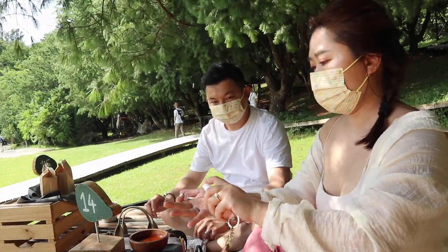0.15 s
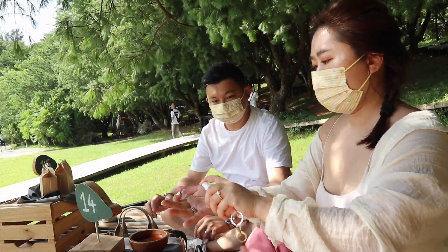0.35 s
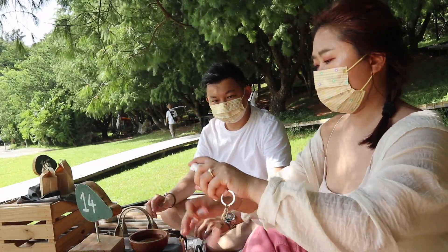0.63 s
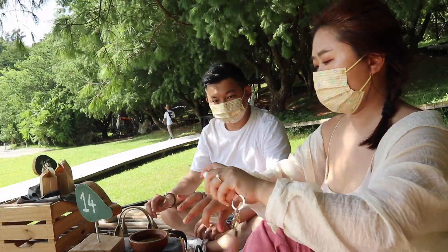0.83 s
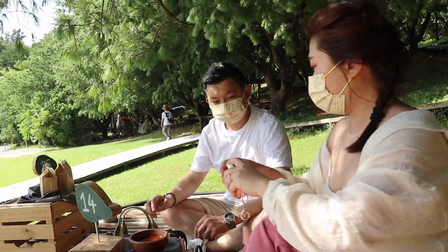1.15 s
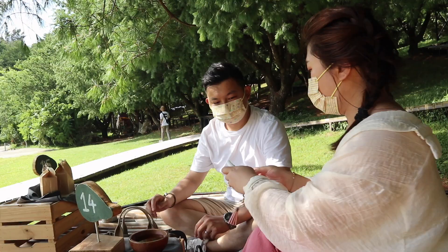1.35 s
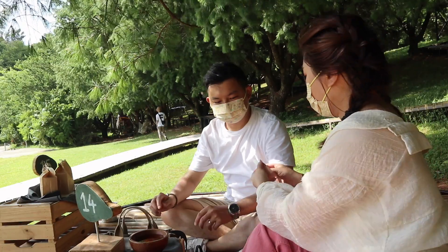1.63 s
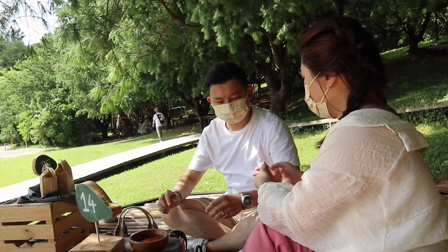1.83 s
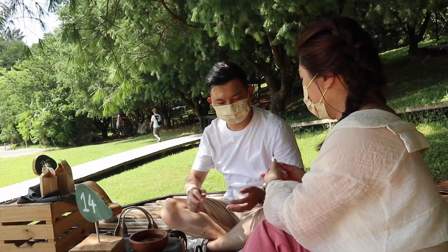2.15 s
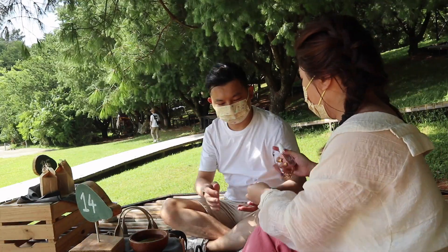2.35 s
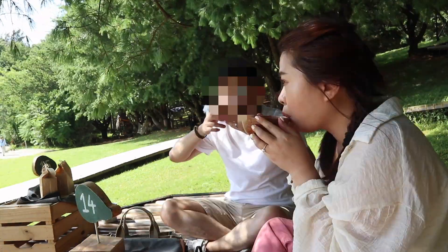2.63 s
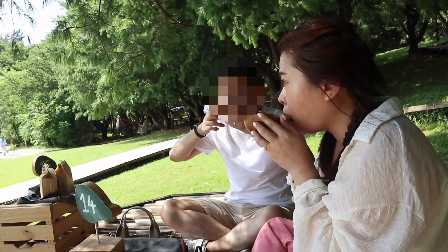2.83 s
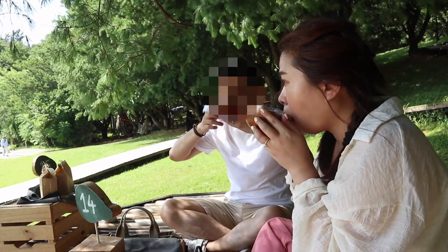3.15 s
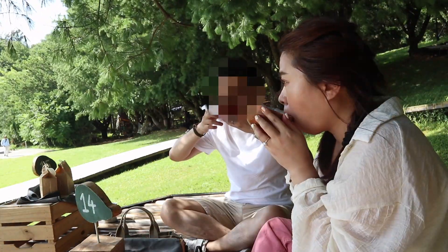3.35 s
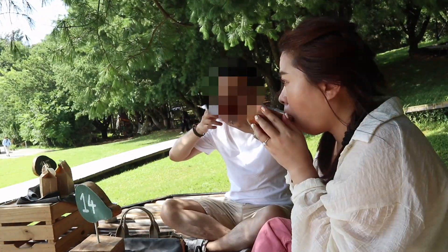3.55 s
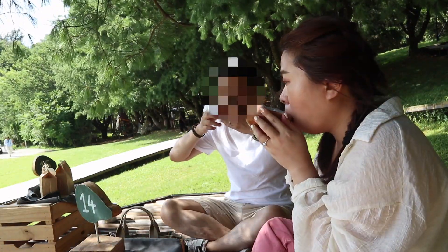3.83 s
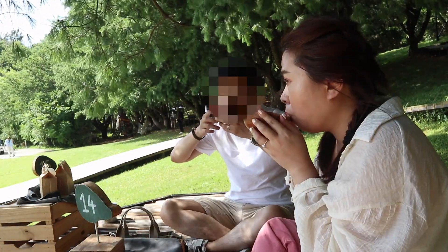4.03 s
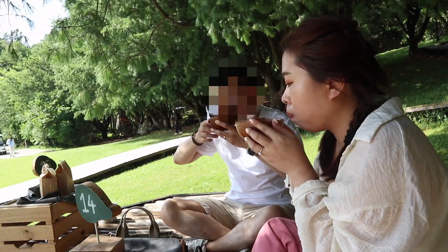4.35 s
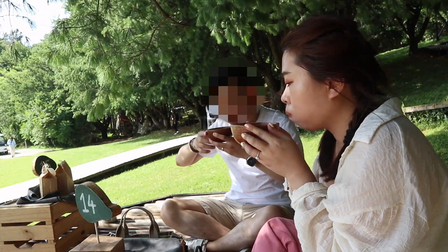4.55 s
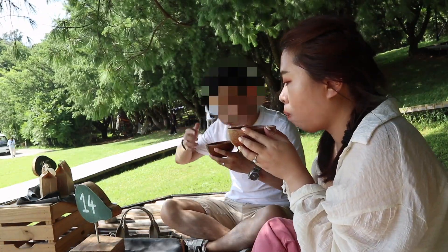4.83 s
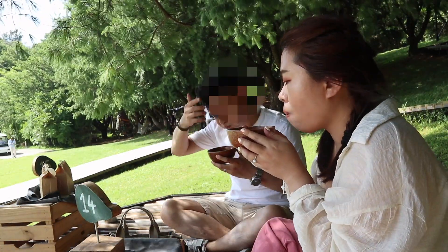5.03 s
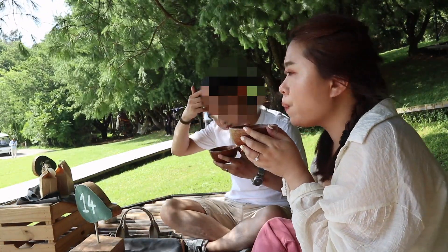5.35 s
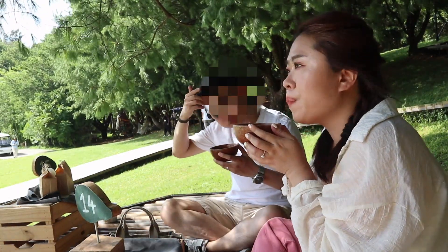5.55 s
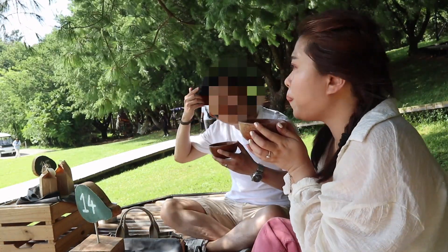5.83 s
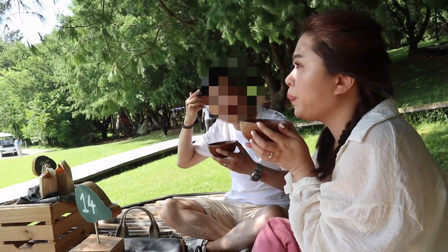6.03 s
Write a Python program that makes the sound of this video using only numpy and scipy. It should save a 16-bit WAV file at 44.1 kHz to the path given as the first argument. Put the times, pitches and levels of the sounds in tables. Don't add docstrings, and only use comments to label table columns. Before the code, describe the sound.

Leaves hiss in a park breeze with droning cicadas and a few far bird chirps, then hard low gusts buffet and slap the microphone.

```python
import sys
import numpy as np
from scipy import signal
from scipy.fft import rfft, irfft
from scipy.io import wavfile
from scipy.ndimage import uniform_filter1d

SR = 44100
rng = np.random.default_rng(int(sys.argv[2]) if len(sys.argv) > 2 else 0)


def level_to_linear(level):
    exponent = np.asarray(level, float) / 20
    return 10 ** exponent


def pcm_store(signal):
    levels = np.round(np.clip(np.atleast_2d(signal), -1, 1) * 32767)
    wavfile.write(sys.argv[1], SR, levels.astype(np.int16).T)


N = 273420

CUTS = [0, 2.508, 4.749, 6.3]
FRAMES = N // 128 + 5
HZ = np.fft.rfftfreq(512, 1 / SR)


def evened(x):
    return x / np.sqrt(np.mean(x ** 2) + 1e-20)


def read(points, hz):
    f, value = np.transpose(points)
    return np.interp(np.log(hz + 1), np.log(f + 1), value)


def add(mix, s, sound):
    part = mix[..., round(s * SR):][..., :sound.shape[-1]]
    part += sound[..., :part.shape[-1]]


def view_gate(k, fade_s=0.0002):
    t = np.arange(N) / SR
    opening = np.clip((t - CUTS[k]) / fade_s + 0.5 + (k == 0), 0, 1)
    closing = np.clip((CUTS[k + 1] - t) / fade_s + 0.5, 0, 1)
    return opening * closing


def coloured(x, points):
    gain = level_to_linear(read(points, np.fft.rfftfreq(len(x), 1 / SR)))
    return irfft(rfft(x) * gain, len(x))


def noise(field_db):
    a, b = rng.standard_normal((FRAMES, len(HZ), 2)).T
    spectra = (a + 1j * b) * level_to_linear(field_db)
    return signal.istft(spectra, nperseg=512, noverlap=384)[1][:N]


def grove(x, t60, direct):
    t = np.arange(SR // 4) / SR
    signs = rng.choice([-1., 1.], (2, len(t)))
    sparse = rng.random((2, len(t))) < 0.05
    tail = signs * sparse * level_to_linear(-60 * t / t60)
    tail /= np.linalg.norm(tail, axis=1)[:, None]
    tail[:, 0] = direct
    return signal.fftconvolve(x, tail, axes=1)[:, :N]


def swells(t, rows, rise, fall):
    start, hold, db = np.transpose(rows)[:3, :, None]
    return db - rise * np.maximum(start - t, 0) - fall * np.maximum(t - start - hold, 0)


def leaves(patchy_db=0.54, flicker_db=0.2):
    # (frequency [Hz], density [dB])
    sum_spectra = [
        [(18, -31), (30, -5), (69, -0.5), (130, -6.5), (206, -5), (407, -4.5), (643, -4), (807, -3.5),
         (1340, -3.5), (3170, -17.5), (5970, -31.5), (6950, -35.5), (11500, -25.5), (12800, -27.5),
         (16600, -63), (22000, -120)],
        [(18, -64), (30, -11), (324, -6), (499, 1), (581, -0.5), (893, 0.5), (2220, -5), (6120, -25),
         (7130, -33.5), (8510, -26), (10700, -17), (11500, -23), (12800, -94), (16600, -94), (22000, -120)],
        [(530, -38.5), (900, -9.5), (3640, -28), (5310, -37), (6140, -38.5), (8010, -60), (9150, -35),
         (10800, -31.5), (12800, -41.5), (16600, -84), (22000, -120)],
    ]
    # (frequency [Hz], density [dB])
    difference_spectra = [
        [(59, -48), (100, -32), (176, -12.5), (1030, 4), (2470, -0.5), (2730, -1), (4270, -2), (6150, -5),
         (8000, -21.5), (11300, -3.5), (12800, -12), (16600, -44), (22000, -120)],
        [(530, -68), (900, -29), (1050, -67), (1280, -47), (1550, -22.5), (1960, -15), (2310, -15), (3370, -7),
         (8190, -17), (10600, -6), (12800, -24.5), (16600, -45), (22000, -120)],
        [(1290, -35), (2200, -2), (2610, -10), (3270, 0), (6880, -8), (7910, -11), (8900, -14.5), (11000, 0.5),
         (12800, -13), (16600, -38), (22000, -120)],
    ]
    # (time [s], level [dB])
    breeze = [
        [(0.0, 1.34), (2.51, 0.5)],
        [(2.51, -0.04), (4.75, 0.3)],
        [(4.749, -5), (6.2, -6.5)],
    ]
    sum_db, difference_db = [-36, -40.5, -51], [-44, -47, -57]
    t = np.arange(N) / SR
    patches = rng.standard_normal((FRAMES, len(HZ))).T
    patches = uniform_filter1d(patches, size=7, axis=0)
    patches = evened(uniform_filter1d(patches, size=24, axis=1))
    flicker = evened(uniform_filter1d(rng.standard_normal(FRAMES), size=20))
    field_db = patchy_db * patches + flicker_db * flicker
    common, apart = noise(field_db), noise(field_db)
    out = np.zeros((2, N))
    for k in range(3):
        gain = view_gate(k) * level_to_linear(np.interp(t, *np.transpose(breeze[k])))
        out[0] += gain * level_to_linear(sum_db[k]) * evened(coloured(common, sum_spectra[k]))
        out[1] += gain * level_to_linear(difference_db[k]) * evened(coloured(apart, difference_spectra[k]))
    return out


def airflow(t):
    # (time [s], level [dB], eddy pitch [Hz], share of small eddies [dB])
    steady = [
        [(0, -72, 70, -37), (0.9, -50, 70, -37), (1.7, -44.5, 70, -41), (2.45, -50.5, 70, -41)],
        [(2.56, -46, 89, -28), (2.7, -68, 226, -32), (2.9, -60, 120, -30), (3.05, -72, 190, -30),
         (3.64, -72.5, 144, -40), (3.9, -37, 177, -52), (4.3, -31.5, 224, -34), (4.62, -30, 220, -35),
         (4.65, -50.5, 169, -39)],
        [(4.75, -39, 198, -37), (5.1, -30, 230, -36.5), (5.4, -34, 270, -27.5), (5.55, -37.5, 316, -37),
         (6.2, -31, 338, -16.5)],
    ]
    # (start [s], hold [s], level [dB], share of small eddies [dB])
    light_gusts = [(0.09, .02, -57, -38), (0.49, .03, -46, -35), (0.815, 0.017, -46.5, -44),
                   (1.022, 0.037, -47.5, -42), (1.45, .17, -53.5, -44), (1.743, 0.54, -43.5, -29),
                   (2.44, 0.021, -37, -37)]
    # (start [s], hold [s], level [dB], share of small eddies [dB])
    hard_gusts = [(2.725, 0.013, -36.5, -46), (2.8, 0.043, -42, -41), (2.98, 0.016, -50, -40),
                  (3.685, 0.086, -38.5, -60.5), (3.915, 0.12, -32, -41), (4.03, 0.1, -28.5, -34),
                  (4.23, 0.023, -28.5, -50), (4.312, 0.041, -25.5, -29), (4.42, 0.056, -29, -36),
                  (4.574, 0.019, -24, -30), (4.729, 0.015, -31, -21), (4.87, .02, -39, -40),
                  (4.925, 0.0085, -29, -27), (5.0, 0.013, -30.5, -6), (5.075, 0.018, -30.5, -15.5),
                  (5.16, 0.051, -32, -30), (5.386, .05, -31.5, -8.5), (5.444, 0.052, -29, -10),
                  (5.585, 0.023, -34.5, -23), (5.63, 0.022, -31, -25), (5.25, 0.037, -29.5, -34.5),
                  (5.718, 0.0067, -31.5, -28), (5.81, 0.014, -34, -28), (5.91, 0.039, -32.5, -4),
                  (6.025, .025, -30, -13), (6.06, 0.025, -27, -15)]
    s, db, hz, small_db = np.transpose(sum(steady, []))
    light = swells(t, light_gusts, rise=120, fall=250)
    hard = swells(t, hard_gusts, rise=820, fall=620)
    power = level_to_linear(2 * np.vstack([np.interp(t, s, db), light, hard]))
    gust_shares = np.transpose(light_gusts + hard_gusts)[-1][:, None] + 0 * t
    shares = np.vstack([np.interp(t, s, small_db), gust_shares])
    total = power.sum(0)
    return np.sqrt(total), np.interp(t, s, hz), (power * shares).sum(0) / total


def gusts(rise_db=11, top_db=4, fall_db=22, lumps_db=1.5, bright_lumps_db=1.41):
    frame_t = np.arange(FRAMES) * 128 / SR
    level, hz, small_db = airflow(frame_t)
    reach = 2.5 + small_db / fall_db
    octaves = np.log2((HZ[:, None] + 12) / hz)
    field = -10 * np.log10(level_to_linear(-2 * rise_db * octaves) + level_to_linear(2 * top_db * octaves))
    field -= 10 * np.log10(1 + level_to_linear(2 * fall_db * (octaves - reach)))
    field -= 10 * np.log10(np.mean(level_to_linear(2 * field), axis=0))
    puffs = evened(uniform_filter1d(rng.standard_normal(FRAMES), size=4))
    field += bright_lumps_db * puffs * np.clip(np.log2((HZ[:, None] + 1) / 250), 0, 3)
    slow = evened(signal.lfilter(*signal.butter(2, 45, fs=SR), rng.standard_normal(N)))
    lumps = level_to_linear(2 * lumps_db * np.tanh(0.5 * slow))
    shared = evened(noise(field) * lumps)
    own = evened(noise(field) * lumps)
    pair = np.array([shared, own])
    pair /= np.sqrt(uniform_filter1d(pair ** 2, size=2600, axis=1) + 1e-9)
    return np.interp(np.arange(N) / SR, frame_t, level) * pair


def slaps(per_s=45, over_db=3, spread_db=4, swing_hz=620, damping=1.9):
    t = np.arange(0, N, 128) / SR
    level, _, small_db = airflow(t)
    luck, size = rng.random((N, 2)).T
    strength = level_to_linear(over_db + spread_db * np.cos(40 * size))
    hits = (luck < per_s / SR) * np.sign(size - 0.5) * strength
    hits *= np.interp(np.arange(N) / SR, t, level * level_to_linear(0.38 * (small_db + 10)))
    cycles = np.arange(300) / SR * swing_hz
    swing = np.sin(2 * np.pi * cycles) * np.exp(-damping * cycles)
    return signal.oaconvolve(hits, swing)[:N] * 2


def cicada(rate_hz, drum_hz, width_hz, db, drift=0.08, jitter=0.013, uneven_db=3):
    period = SR / rate_hz
    at = np.arange(0, N, period)
    wander, shake, size = rng.standard_normal((len(at), 3)).T
    wander = evened(signal.lfilter([1], [1, -1.8, 0.81], wander))
    at = at + period * (drift * wander + jitter * shake)
    clicks = np.zeros(2 * N)
    clicks[np.clip(2 * at, 0, 2 * N - 1).astype(int)] = level_to_linear(uneven_db * size)
    hz = np.fft.rfftfreq(N, 1 / SR)
    drum = np.exp(-0.5 * ((hz - drum_hz) / (width_hz / 2)) ** 2)
    return level_to_linear(db) * evened(irfft(rfft(clicks)[:len(hz)] * drum, N))


def cicadas(high_db=-3, low_db=-2, mid_db=-9):
    # (click rate [Hz], drum resonance [Hz], drum width [Hz], level [dB])
    high_singers = [
        [(439, 9600, 2500, -2.8)],
        [(546, 10840, 1300, -4), (409.6, 9500, 1500, -4.5)],
        [(530, 9900, 3050, 1.5)],
    ]
    # (click rate [Hz], drum resonance [Hz], drum width [Hz], level [dB])
    low_singers = [
        [(676, 7120, 1730, -0.25), (647, 8500, 1200, -4.5)],
        [(732, 7100, 2000, -1.5), (354.6, 7350, 1000, -2.5)],
        [(704, 7900, 1400, 3.2)],
    ]
    # (start [s], hold [s], level [dB])
    high_song = [
        [(0, 1.23, -45), (2.3, .3, -47.5)],
        [(2.59, 0.036, -41.5), (2.98, 0.2, -41.5), (3.52, 0.2, -41), (4.06, 0.21, -44.5), (4.56, 0.18, -44.5)],
        [(4.97, 1.06, -63)],
    ]
    # (start [s], hold [s], level [dB])
    low_song = [
        [(1.5, 0.65, -45.5)],
        [(2.5, 1.265, -48), (4.6, 0.022, -59.5)],
        [(5.95, .3, -71)],
    ]
    high_floor_db = [-52, -47, -73]
    low_rise, low_fall = [3.8, 30, 32], [45, 170, 100]
    t, out = np.arange(N) / SR, np.zeros((2, N))
    for k in range(3):
        high = swells(t, high_song[k], rise=39, fall=45).max(0)
        high = np.maximum(high, high_floor_db[k])
        low = swells(t, low_song[k], low_rise[k], low_fall[k]).max(0)
        low -= 90 * np.maximum(0.48 - t, 0)
        song = level_to_linear(high + high_db) * sum(cicada(*singer) for singer in high_singers[k])
        song += level_to_linear(low + low_db) * sum(cicada(*singer) for singer in low_singers[k])
        out += view_gate(k) * grove(song[None], t60=0.17, direct=0.42)
    return out * level_to_linear(np.array([[mid_db], [0]]))


def birds(rough=0.46, trill=0.046):
    # (time [s], level [dB], start pitch [Hz], end pitch [Hz], length [s])
    chirps = [(0.45, -41, 3830, 3350, 0.036), (0.473, -37, 3110, 2640, 0.037),
              (0.593, -43, 3220, 3340, 0.032), (0.6, -40.5, 2450, 2940, 0.039),
              (1.071, -39, 3380, 2850, 0.018), (1.34, -44.5, 3600, 2940, 0.055),
              (1.412, -44, 4200, 3450, 0.041), (1.438, -37.5, 3150, 3000, 0.024),
              (3.002, -48.5, 3770, 3850, 0.035), (3.035, -44, 3180, 3040, 0.04),
              (3.067, -48, 3770, 3860, .025), (3.084, -44.5, 3516, 3490, 0.023),
              (3.108, -41.5, 3100, 2780, 0.0275), (3.808, -40.5, 3780, 3390, 0.032),
              (3.851, -46, 3380, 3020, 0.027), (4.127, -43.5, 3370, 3400, 0.033),
              (4.176, -38, 2530, 3540, 0.018), (4.19, -52.5, 3570, 3420, 0.024),
              (3.08, -43, 3180, 3120, 0.027), (5.165, -61, 3310, 3250, 0.026),
              (4.457, -51, 3680, 3500, .02), (5.129, -63.5, 3720, 3280, 0.028),
              (5.176, -56.5, 2840, 2940, .04)]
    off_centre_db = [-5, -19, -15]
    out = np.zeros((2, N))
    for s, db, from_hz, to_hz, length in chirps:
        side_db = off_centre_db[np.searchsorted(CUTS, s) - 1]
        hz = np.linspace(from_hz, to_hz, round(length * SR))
        flutter = evened(uniform_filter1d(rng.standard_normal(4000), size=20))[:len(hz)]
        wobble = evened(uniform_filter1d(rng.standard_normal(4000), size=90))[:len(hz)]
        hz *= 1 + trill * wobble
        whistle = np.sin(2 * np.pi * np.cumsum(hz) / SR)
        note = whistle * (1 + rough * flutter) * np.hanning(len(hz))
        add(out, s, level_to_linear(db) * note * level_to_linear(np.array([[0], [side_db]])))
    return grove(out, t60=0.2, direct=0.95) * level_to_linear(-1.5)


def pops(trim_db=-2, damping=1.8, edge_hz=2600, snap=0.5):
    # (time [s], peak level [dB], swing frequency [Hz])
    eddies = [(2.721, -20, 252), (4.049, -18.5, 200), (4.17, -12, 200), (4.309, -7, 238), (4.367, -9, 215),
              (4.438, -31, 270), (4.732, -34, 210), (4.837, -27, 280), (4.919, -29, 303),
              (4.984, -18.5, 255), (5.041, -24, 364), (5.328, -33, 344), (5.402, -28, 283),
              (5.45, -25.5, 290), (5.536, -31.5, 557), (5.629, -31, 290), (5.707, -24, 400),
              (5.721, -21.5, 330), (5.77, -24, 400), (5.818, -23, 330), (5.794, -25, 258),
              (5.864, -17, 500), (5.882, -21, 420), (5.946, -24, 536), (5.926, -22.5, 307),
              (6.032, -24, 530), (6.075, -27, 366), (6.106, -38, 549), (6.129, -14.5, 480)]
    out = np.zeros(N)
    for s, db, hz in eddies:
        cycles = np.arange(900) / SR * hz
        decay = np.exp(-damping * cycles)
        swing = np.sin(2 * np.pi * cycles) + snap * np.sin(6 * np.pi * cycles) * decay
        add(out, s, level_to_linear(db + trim_db) * swing * decay)
    return signal.lfilter(*signal.butter(2, edge_hz, fs=SR), out)


def microphone_wind():
    # (frequency [Hz], gain [dB])
    bass_cut = [(20, -19), (60, -4.5), (120, 1.5), (4000, -11.5)]
    # (frequency [Hz], gain [dB])
    port_difference = [(40, -40), (150, -47), (350, -25.5), (700, -17.5), (1300, -8.5), (3000, -11)]
    wind = gusts() + pops() + slaps()
    return np.array([coloured(wind[0], bass_cut), coloured(wind[1], port_difference)])


def scene():
    mid, side = leaves() + microphone_wind() + cicadas() + birds()
    ending = np.clip((N - np.arange(N)) / 200, 0, 1)
    return np.array([mid + side, mid - side]) * ending


def gated(x, under_db=-11, hunger_db=-43.0, chance_db=2.5, from_hz=4300, top_hz=(12350, 12800), sway_hz=380):
    window = np.sin(np.pi * (np.arange(2048) + 0.5) / 2048)
    shift = 165
    pair = np.pad([x[0] + x[1], x[0] - x[1]], ((0, 0), (shift, 0)))
    hz, _, z = signal.stft(pair, SR, window, nperseg=2048, noverlap=1024)
    power = (abs(z[:, :1024]) ** 2).reshape(2, 64, 16, -1).mean(2)
    mask = uniform_filter1d(power.max(0), size=7, axis=0)
    mask += level_to_linear(2 * hunger_db) * uniform_filter1d(power[0].sum(0), size=9)
    luck = rng.standard_normal(power.shape[::-1]).T
    chance = evened(uniform_filter1d(luck, size=4, axis=1))
    audible = power > mask * level_to_linear(2 * (under_db + chance_db * chance))
    sway = evened(uniform_filter1d(luck[:, :1], size=3, axis=2))
    ceiling = np.reshape(top_hz, (2, 1, 1)) + sway_hz * sway
    audible &= hz[8:1024:16, None] < ceiling
    z[:, :1024] *= np.repeat(audible, 16, axis=1) | (hz[:1024, None] < from_hz)
    mid, side = signal.istft(z, SR, window, nperseg=2048, noverlap=1024)[1][:, shift:shift + N]
    return np.array([mid + side, mid - side]) / 2


def top_cut(x):
    return signal.sosfilt(signal.butter(12, 12910, fs=SR, output="sos"), x)


def record(dry):
    mix = gated(dry)
    return top_cut(mix)


dry = scene()
out = record(dry)
pcm_store(out)
```